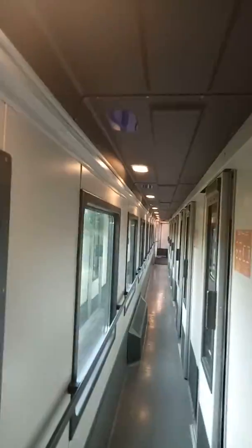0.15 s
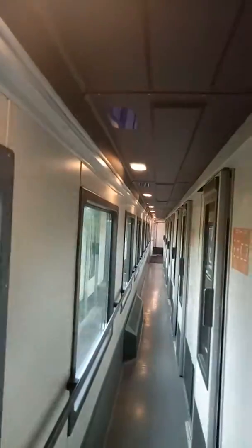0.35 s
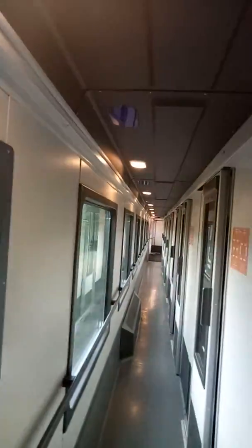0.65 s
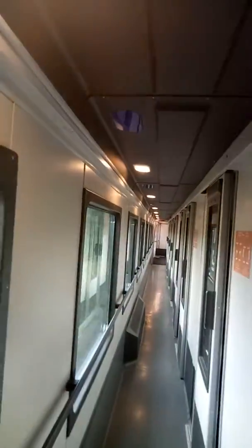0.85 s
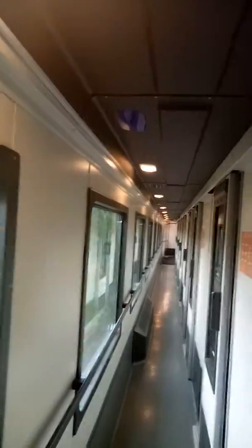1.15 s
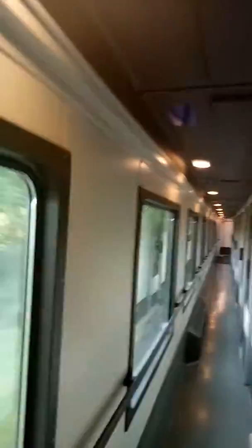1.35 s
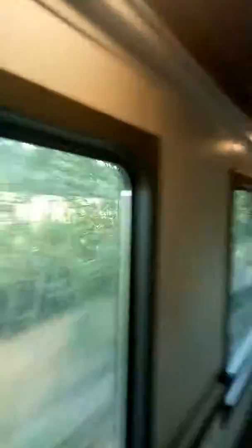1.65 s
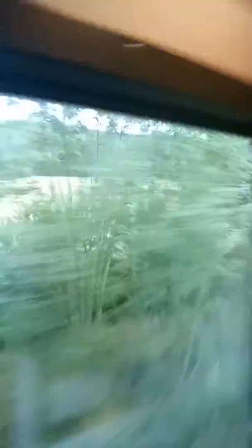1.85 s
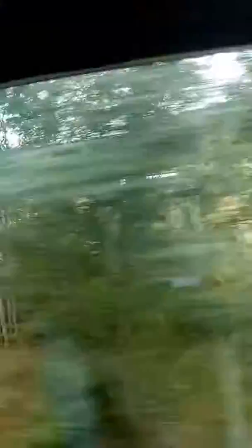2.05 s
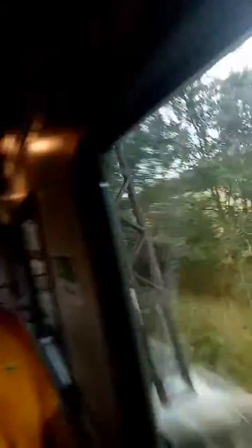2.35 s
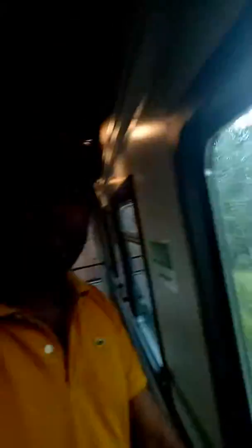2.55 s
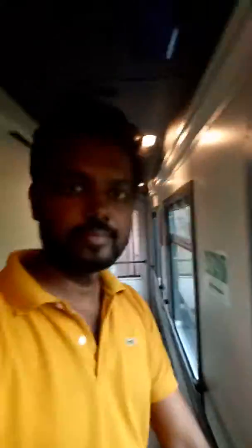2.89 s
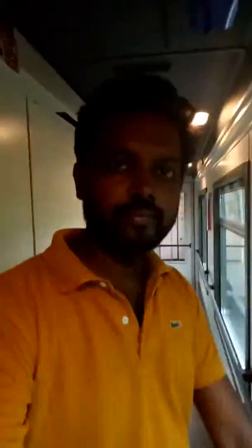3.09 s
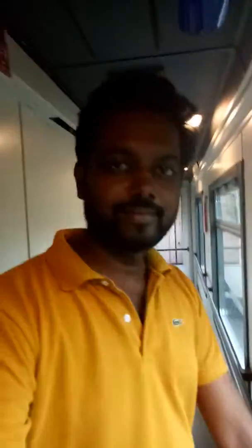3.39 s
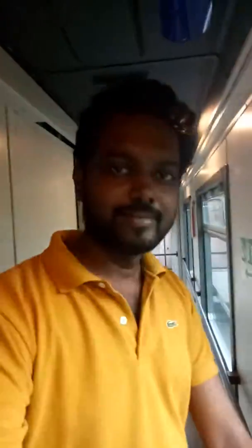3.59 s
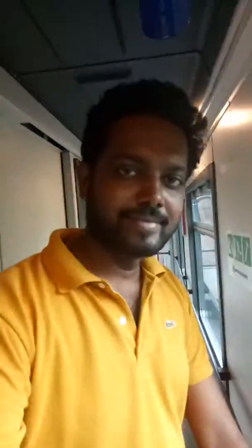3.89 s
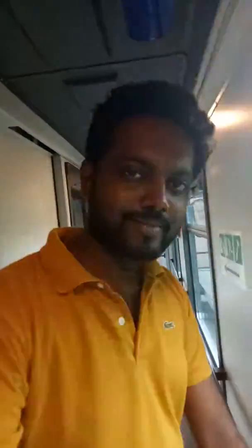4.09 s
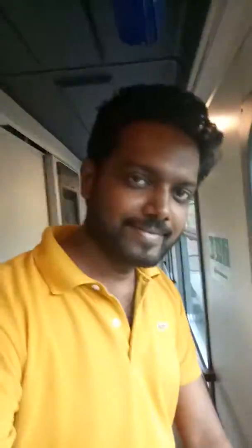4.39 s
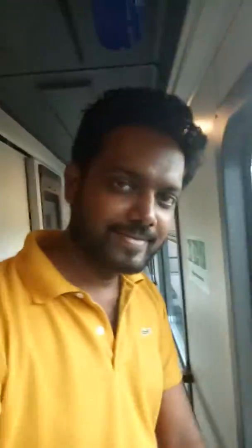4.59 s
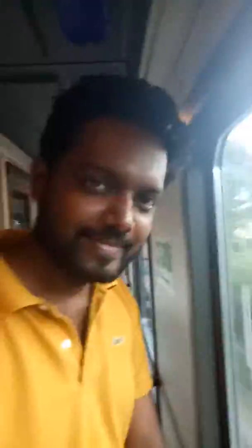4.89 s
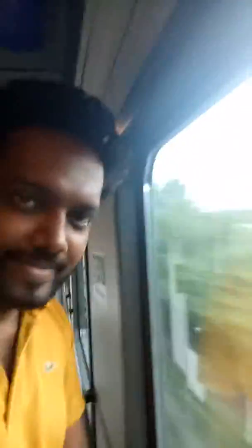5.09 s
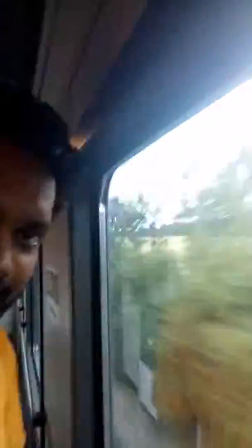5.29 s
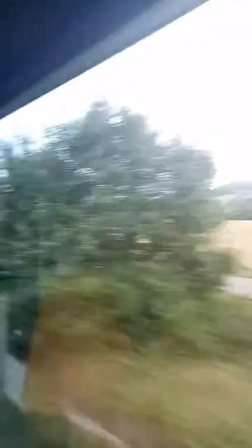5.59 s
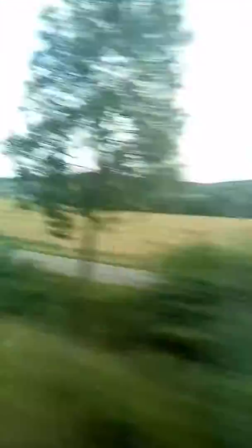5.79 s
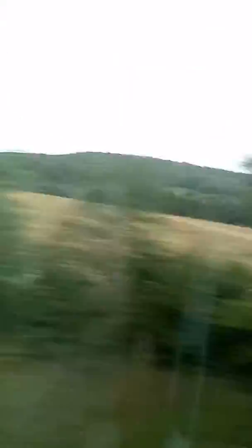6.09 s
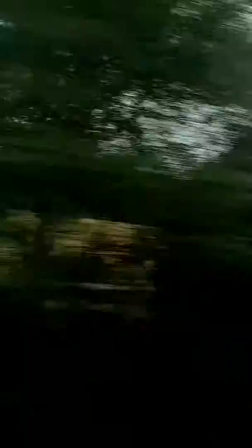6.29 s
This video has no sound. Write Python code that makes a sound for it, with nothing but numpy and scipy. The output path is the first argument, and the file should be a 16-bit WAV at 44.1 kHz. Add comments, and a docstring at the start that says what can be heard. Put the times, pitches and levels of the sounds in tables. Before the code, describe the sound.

Continuous train interior close beside the windows: bass-heavy rumbling with short boomy lurches, a broad mid-range roar of wheels and soft airy hiss. A few muffled knocks underfoot come first; then the window air grows hollow and sharper as the handheld microphone swings round. Later a faint high ring sings more clearly, a flange brushes the rail, and a last cluster of dull thumps arrives. Stereo, weighted left, with no rhythmic rail joints.

```python
"""A deep rumble with a swelling boom runs throughout, in the corridor of a passenger carriage at speed on welded track.
The bogies shake the body: shaped noise in its panels and two wavering low tones; dull knocks come up from below.
The wheels roar on the rails as broad noise, ring in a thin whine of wavering tones, and a flange brushes the rail.
Air hisses along the windows as bands of noise that grow when the two-port microphone beside them turns back."""
import sys
import numpy as np
from scipy import signal
from scipy.fft import rfft, irfft, next_fast_len
from scipy.io import wavfile
from scipy.ndimage import uniform_filter1d, minimum_filter1d

SR = 44100
rng = np.random.default_rng(int(sys.argv[2]) if len(sys.argv) > 2 else 0)


def int16_out(signal):
    """Quantize to a 16-bit WAV file."""
    q = np.round(np.clip(np.atleast_2d(signal).T, -1, 1) * 32767)
    wavfile.write(sys.argv[1], SR, q.astype(np.int16))


N = 284445  # samples


def from_db(db):
    """Decibels to gain."""
    return 10 ** (np.asarray(db) / 20)


def rms_one(x):
    """Scale so that the middle of the channels has rms 1."""
    middle = np.atleast_2d(x).mean(axis=0)
    return x / np.sqrt(np.mean(middle ** 2) + 1e-20)


def in_time(rows):
    """A curve of (t/s, value) at every sample."""
    t, value = np.transpose(rows)
    return np.interp(np.arange(N) / SR, t, value)


def swells(rows):
    """Sum of cosine-squared rises and falls: (crest t/s, whole length/s, height)."""
    t = np.arange(N) / SR
    return sum(height * np.cos(np.pi * np.clip((t - crest) / length, -.5, .5)) ** 2
               for crest, length, height in rows)


def swells_db(rows):
    """Gain of swells from silence: (crest t/s, whole length/s, level/dB)."""
    return swells([(crest, length, from_db(db)) for crest, length, db in rows])


def drift(rate):
    """Slow chance of rms 1: noise through two equal one-pole low-passes with corners at rate/Hz."""
    step = 40  # samples between the slow values
    pole = np.exp(-2 * np.pi * rate * step / SR)
    noise = rng.standard_normal(N // step + 2002)
    slow = signal.lfilter([1], [1, -2 * pole, pole * pole], noise)[2000:]  # drop the run-in
    return np.interp(np.arange(N) / step, np.arange(len(slow)), rms_one(slow))


def bin_hz():
    """Frequencies of the noise spectra, f/Hz."""
    return np.maximum(np.fft.rfftfreq(next_fast_len(N, True), 1 / SR), 1)


def over_hz(points):
    """Points joined on a log-frequency axis."""
    hz, value = np.transpose(points)
    return np.interp(np.log(bin_hz()), np.log(hz), value)


def colour(points):
    """Gain of a spectrum that falls away steeply outside its end points."""
    hz = bin_hz()
    outside = np.minimum(1, np.minimum(hz / points[0][0], points[-1][0] / hz))
    return from_db(over_hz(points)) * outside ** 5


def pan(left_db):
    """Left and right gains for a level difference, at constant power."""
    gains = from_db(np.array([[.5], [-.5]]) * left_db)
    return gains / np.sqrt(np.mean(gains ** 2, axis=0))


def resonance(hz, width_hz):
    """Power response of one mode, total 1; it is 6 dB down at width_hz either side."""
    power = 1 / (1 + ((bin_hz() - hz) / width_hz) ** 2) ** 2
    return power / power.sum()


# Likeness of the microphone's two ports in the cabin field: f/Hz, correlation (-1 to 1)
LIKENESS = [(60, 0.94), (150, 1), (260, 0.86), (450, 0.86), (560, 0.4), (660, 0.61), (850, 0.22),
            (1100, 0.043), (1380, 0.15), (1700, -0.29), (2100, -0.079), (2550, 0.089), (3300, -0.016)]


def cabin_noise(gain):
    """Coloured noise of the diffuse cabin field: long waves reach both ports alike, short ones do not."""
    size = next_fast_len(N, True)
    mid, side = rfft(rng.standard_normal((2, size)))
    alike = np.clip(over_hz(LIKENESS), -1, 1)
    both = np.sqrt(1 + alike) * mid + np.sqrt(1 - alike) * side * [[1], [-1]]
    return rms_one(irfft(both * gain, size)[:, :N])


def mode_noise(hz, width_hz):
    """One mode driven by noise."""
    return cabin_noise(np.sqrt(resonance(hz, width_hz)))


def modes_noise(rows):
    """Several modes driven by one noise: (f/Hz, width/Hz, relative level/dB)."""
    power = sum(from_db(db) ** 2 * resonance(hz, width) for hz, width, db in rows)
    return cabin_noise(np.sqrt(power))


def wavering_tone(hz, wander_hz, rate, flutter_db):
    """A randomly driven mode: its pitch and strength never quite settle."""
    phase = 2 * np.pi * np.cumsum(hz + wander_hz * drift(rate)) / SR
    return rms_one(np.sin(phase) * from_db(flutter_db * drift(rate)))


# Brief drops shared by roar, window sounds, drone and wall panel: lowest t/s, length/s, depth/dB
LULLS = [(0.73, 0.18, 2), (1.18, 0.1, 2), (1.46, 0.068, 1), (2.19, 0.073, 1.5), (2.89, .06, 1.5),
         (3.52, .096, 1.6), (4.7, .08, 3.5), (5.14, 0.064, 1), (5.44, 0.05, 2.5), (5.55, 0.1, 2),
         (5.79, .1, 1.5), (6.17, 0.13, 1.3)]


def lull_db():
    """Depth of the brief drops in level."""
    return swells(LULLS)


# Spectrum of the deep rumble: f/Hz, relative level per Hz/dB
RUMBLE_COLOUR = [(12, -21.5), (20, 0), (33, -23), (42, -17), (53, 1.5), (75, 17), (100, 7), (135, 11.5),
                 (175, 7.5), (260, -12.5)]
# The rumble heaves: crest t/s, length/s, rise/dB (negative sinks)
HEAVES = [(0.83, 0.54, 3.5), (1.27, 0.2, 0), (1.58, .22, -5), (1.85, .16, 4), (2.52, .2, 0),
          (3.25, 0.26, 6), (3.66, 0.13, 6), (4.1, .3, 3), (6.19, .14, -9)]


def rumble():
    """The bogies shake the shell into a heaving low noise."""
    return from_db(-30 + swells(HEAVES)) * cabin_noise(colour(RUMBLE_COLOUR))


# The body's main resonance swells as the carriage lurches: crest t/s, length/s, level/dB
LURCHES = [(0.1, 0.12, -26.5), (0.28, 0.077, -26.5), (0.69, 0.15, -18), (0.94, .2, -26), (1.21, 0.19, -21),
           (1.525, 0.13, -21.5), (1.72, 0.12, -27), (1.94, 0.15, -22), (2.2, 0.26, -24.5),
           (2.33, 0.22, -26), (2.53, 0.11, -20.5), (2.88, 0.092, -23), (3.18, 0.14, -23.5),
           (3.28, 0.1, -24), (3.38, .11, -25.5), (3.77, 0.13, -24), (4.19, 0.084, -28), (4.63, 0.1, -24.5),
           (5.18, 0.27, -24.5), (5.55, 0.23, -28), (5.73, 0.15, -29), (5.85, .13, -21), (6.08, 0.17, -24)]


def boom():
    """The body's main resonance: steady narrow noise, and a wavering tone at each lurch."""
    boom_hz = 116.2
    steady = from_db(-33) * mode_noise(boom_hz, width_hz=8.7)
    lurching = swells_db(LURCHES) * wavering_tone(boom_hz, wander_hz=5.07, rate=15, flutter_db=0.8)
    return steady + lurching


# A second body resonance throbs now and then: crest t/s, length/s, level/dB
THROBS = [(0.26, .16, -27.5), (0.52, .16, -27), (0.9, 0.17, -29.5), (1.14, 0.092, -24.5), (1.38, 0.15, -28),
          (1.6, 0.13, -31), (2.03, 0.11, -35), (2.31, 0.15, -29), (3.6, 0.1, -35), (3.95, 0.12, -34),
          (4.21, 0.065, -26), (6.1, 0.082, -21)]


def throbs():
    """The body resonance above the boom swells as a wavering tone."""
    return swells_db(THROBS) * wavering_tone(149.6, wander_hz=11, rate=18.0, flutter_db=1.0)


# How hard the track shakes the body: t/s, drone level before jolts and lulls/dB
SHAKING = [(0, -29), (0.3, -31.5), (0.6, -28.5), (1.4, -31), (2.3, -29.5), (3.4, -30.5), (4.3, -29),
           (5.6, -28), (6.15, -27.5), (6.45, -27.5)]
# Jolts make drone and panels thump: crest t/s, length/s, rise/dB (negative sinks)
JOLTS = [(0.52, .2, 1.5), (0.86, 0.16, 1.5), (1.45, 0.18, 1.5), (2.07, .11, 2), (2.44, 0.088, -1),
         (2.71, 0.11, 3), (3.62, 0.11, 1.5), (4.5, .2, 1), (5.3, 0.16, 2), (5.47, .1, 0), (6.12, 0.1, 3)]
# Spectrum of the drone: f/Hz, relative level per Hz/dB
DRONE_COLOUR = [(110, 4), (170, 0), (225, 2.5), (300, -3), (400, -6), (560, -10), (750, -12.5), (950, -9.5),
                (1400, -53.5)]
# Floor panel resonances: f/Hz, width/Hz, relative level/dB
PANEL_MODES = [(84.5, 64, -3.5), (102.4, 7, -4.5), (145.5, 18, -2.5), (267, 23, -13.5), (352, 59, -6),
               (460.3, 29, -9)]


def drone_and_panels():
    """Shaking fills the shell with a swaying drone and rings the floor panels."""
    level_db = in_time(SHAKING) + swells(JOLTS) - lull_db()
    sway_db = 0.5 * drift(13.0)
    drone = from_db(level_db + sway_db) * cabin_noise(colour(DRONE_COLOUR))
    panels = from_db(level_db - 0.4) * modes_noise(PANEL_MODES)
    return drone + panels


# A partition drones, louder at some moments than at others: t/s, level/dB
PARTITION_LEVEL = [(0, -38), (0.3, -34), (0.65, -33), (1.15, -38), (1.5, -31.5), (1.9, -35.5), (2.3, -28.5),
                   (2.75, -30), (3.3, -38.5), (3.7, -35), (4.1, -43), (4.45, -39), (4.75, -34), (5.0, -38),
                   (5.25, -32), (5.55, -37), (6.0, -28.5), (6.45, -34)]


def partition():
    """A droning partition: one broad low mode driven by noise."""
    return from_db(in_time(PARTITION_LEVEL)) * mode_noise(191, width_hz=37)


# A light wall panel hums along: t/s, level before lulls/dB
WALL_LEVEL = [(0, -40), (0.55, -36), (0.9, -39), (1.6, -37.5), (2.4, -43), (3.7, -37.5), (5.5, -44),
              (5.9, -40), (6.28, -38), (6.45, -43)]


def wall_panel():
    """A light panel's mode driven by noise; it eases in the lulls."""
    return from_db(in_time(WALL_LEVEL) - lull_db()) * mode_noise(668, width_hz=95)


def body():
    """The shaken carriage body, leaning to the left port."""
    low = rumble() + boom() + throbs()
    return (low + drone_and_panels() + partition() + wall_panel()) * pan(left_db=5.5)


# Spectrum of the wheel roar: f/Hz, relative level per Hz/dB
ROAR_COLOUR = [(450, -8.5), (750, -9), (1000, -6), (1300, -5.5), (1600, -2), (1780, -0.5), (2050, -3.5),
               (2400, -7), (2750, -14.5), (3300, -27), (5000, -40)]
# The roar leans left: f/Hz, left-right level/dB
ROAR_PAN = [(700, 6), (1200, 8.5), (1800, 10), (2200, 13.5), (2800, 8), (4000, 4)]
# Weaker wheel modes: f/Hz, width/Hz, relative level/dB, left-right level/dB
WHEEL_MODES = [(1636, 23, -14, 12.5), (1804, 18, -20.5, 7.5), (1868, 11, -20.5, 9.5),
               (2280, 18, -17.5, 7.5), (2345, 25, -16, 16), (3043, 13, -22, 8), (3424, 40, -22.5, -7),
               (4710, 27, -27.5, 7.5), (5240, 25, -33, 2.5), (5410, 30, -33, 2.5)]


def wheels():
    """Rail roughness makes a broad roar and keeps the wheel modes ringing."""
    roar_db, ringing_db = -29, -39
    roar = from_db(roar_db) * cabin_noise(colour(ROAR_COLOUR) * pan(over_hz(ROAR_PAN)))
    power = sum((from_db(db) * pan(left_db)) ** 2 * resonance(hz, width)
                for hz, width, db, left_db in WHEEL_MODES)
    ringing = from_db(ringing_db) * cabin_noise(np.sqrt(power))
    flutter_db = 0.5 * drift(8.3)
    return from_db(flutter_db) * (roar + ringing)


# Pitch of the wheel's ring, higher by the end: t/s, f/Hz
WHINE_PITCH = [(0, 1719), (2.3, 1722), (4.2, 1720), (4.9, 1714), (5.5, 1737), (6.45, 1733)]
# The ring sings out over its steady level: crest t/s, length/s, added level/dB
SPELLS = [(0.444, 0.12, -30.5), (0.555, 0.11, -33), (0.14, .14, -40), (0.72, .12, -43), (1.13, 0.13, -38.5),
          (1.25, 0.11, -37), (1.58, 0.13, -39), (1.79, 0.18, -36), (1.93, .14, -37), (2.06, 0.2, -36),
          (2.22, 0.19, -36), (2.36, 0.16, -35), (2.67, 0.13, -37), (4.17, .25, -41), (4.66, .2, -36),
          (4.893, 0.26, -28), (5.08, 0.13, -44), (5.4, 2.6, -41.5), (5.28, 0.28, -31.5),
          (5.49, 0.18, -29.5), (5.77, 0.26, -30), (6.16, 0.1, -37), (6.29, 0.092, -31)]
# A neighbouring lower mode answers in weaker spells: crest t/s, length/s, level/dB
LOWER_SPELLS = [(0.85, .4, -42), (1.34, 0.18, -33), (2.05, .3, -37), (4.68, .22, -38), (4.95, 0.5, -35),
                (5.33, .3, -40), (5.75, .4, -37), (6.2, 0.27, -40)]
# A higher wheel mode rings faintly: crest t/s, length/s, level/dB
UPPER_SPELLS = [(3.3, 0.5, -41), (4.42, 0.66, -37), (5.62, 0.14, -39), (5.98, 0.22, -37)]


def whine():
    """Two close wheel modes and a higher one sing in spells; the main one wavers apart in each port."""
    pitch_hz = in_time(WHINE_PITCH)
    singing = from_db(-40) + swells_db(SPELLS)  # faint steady ring plus spells
    main = np.array([wavering_tone(pitch_hz, wander_hz=3.6, rate=12.5, flutter_db=1.6) for _ in range(2)])
    lower_tone = wavering_tone(pitch_hz - 57, wander_hz=8, rate=26, flutter_db=5.0)
    upper_tone = wavering_tone(2384, wander_hz=7, rate=22, flutter_db=3.5)
    others = swells_db(LOWER_SPELLS) * lower_tone + swells_db(UPPER_SPELLS) * upper_tone
    return (singing * main + others) * pan(left_db=22.5)


# A flange brushes the rail: crest t/s, length/s, level/dB
BRUSHES = [(0.04, .14, -39), (1.63, 0.72, -40), (5.02, 0.11, -36.5), (5.36, 0.1, -30), (5.98, 0.37, -31.5)]
# Modes it sets ringing: f/Hz, width/Hz, relative level/dB
FLANGE_MODES = [(1960, 130, 1), (2190, 35, -6), (2260, 23, -6), (2520, 120, -11.5)]


def flange():
    """A flange brushes the rail: bright swells of noise in the wheel's modes."""
    return swells_db(BRUSHES) * modes_noise(FLANGE_MODES) * pan(left_db=16)


# Dull knocks from the running gear: t/s, level/dB, centre f/Hz, width/Hz
KNOCKS = [(0.135, -28, 640, 170), (0.415, -22, 215, 50), (0.545, -29, 320, 90), (0.62, -34, 600, 200),
          (1.385, -33, 480, 200), (2.05, -30, 215, 45), (3.89, -24, 230, 60), (6.085, -22, 227.5, 60),
          (6.25, -27, 330, 90), (6.275, -31, 680, 240), (6.365, -26, 368, 130)]


def knocks():
    """Each blow from the running gear sets a patch of close body modes ringing briefly."""
    attack_s, t60_s = 0.0046, 0.32
    out = 0
    for start, db, hz, width in KNOCKS:
        age = np.maximum(np.arange(N) / SR - start, 0)
        decay = from_db(db - 60 * age / t60_s)
        envelope = np.minimum(age / attack_s, 1) * decay
        out = out + envelope * mode_noise(hz, width)
    return out * pan(left_db=7.0)


# The rolling noise swells in the low middle: crest t/s, length/s, level/dB
ROLLS = [(0.14, .12, -34), (0.52, .26, -37), (1.62, .2, -33.5), (2.08, .1, -36), (2.72, 0.13, -36),
         (3.65, .14, -37), (3.3, 0.57, -44), (4.52, .16, -41), (4.77, .12, -32), (5.28, .3, -39),
         (6.07, 0.24, -36), (6.32, 0.3, -33.5)]
# Spectrum of these swells: f/Hz, relative level per Hz/dB
ROLL_COLOUR = [(250, -3), (330, 3), (450, -12), (650, -3.5), (950, -6)]


def rolls():
    """Low-middle swells of the rolling noise."""
    return swells_db(ROLLS) * cabin_noise(colour(ROLL_COLOUR)) * pan(left_db=3.5)


# Where the microphone points: t/s, turn (0 = ahead along the corridor, 1 = back along it)
TURN = [(0, 0.31), (1.5, 0.13), (2.15, 0.39), (2.7, 0.72), (3.6, 0.95), (4.5, 0.9), (4.85, 0.56),
        (5.45, 0.66), (5.85, 0.13), (6.45, 0.3)]


def microphone_turn():
    """The microphone's turn beside the windows."""
    return in_time(TURN)


# Spectrum of the air's rush: f/Hz, relative level per Hz/dB
RUSH_COLOUR = [(700, -10), (1000, -1.5), (1250, 6.5), (1430, 10), (1600, 5.5), (2000, -45.5)]


def window_rush():
    """The slipstream scours the glass: a rush that grows as the microphone turns back."""
    level_db = -40.5 + 3.5 * microphone_turn() + 1.0 * drift(3.9)
    return from_db(level_db) * cabin_noise(colour(RUSH_COLOUR)) * pan(left_db=5.5)


# Hollow resonances come and go at the window: crest t/s, length/s, f/Hz, width/Hz, level/dB
HOLLOW_SPELLS = [(2.5, 1.0, 1480, 27, -38), (2.73, .12, 1580, 110, -31), (2.9, 0.73, 1370, 18, -36),
                 (3.12, .2, 1360, 12, -37), (3.05, .6, 1620, 25, -41), (3.35, 2, 1117, 35, -40),
                 (3.6, .5, 1390, 16, -37), (3.777, .4, 1438, 22, -35.5), (4.07, .25, 1460, 41, -34),
                 (4.45, .4, 1410, 30, -38)]


def window_hollows():
    """Shifting hollow resonances in the slipstream's noise."""
    hollows = sum(swells_db([(crest, length, db)]) * mode_noise(hz, width)
                  for crest, length, hz, width, db in HOLLOW_SPELLS)
    return hollows * pan(left_db=13.5)


# Flickering bands of the hiss: f/Hz, width/Hz, level against the hiss/dB
PATCHES = [(2750, 240, -15), (3320, 260, -16), (4090, 330, -15.5)]


def hiss_patches():
    """Bands of the hiss that flare and fade each on its own."""
    return sum(from_db(db + 3 * drift(15)) * mode_noise(hz, width) for hz, width, db in PATCHES)


# Spectrum of the window hiss: f/Hz, relative level per Hz/dB
HISS_COLOUR = [(1800, -6.5), (2700, 1), (3300, -1), (4000, -0.5), (4550, -3), (5100, -8.5), (6000, -13.5),
               (6900, -21), (7500, -28.5), (8200, -39), (9500, -52)]
# The hiss about its mean direction: f/Hz, left-right level/dB
HISS_PAN = [(2500, 2), (3800, 2), (4600, -4.5), (5300, -1.5), (6500, 2.5), (7300, 0.5), (8500, -4),
            (14000, -2.5)]


def window_hiss():
    """Air hisses along the glass, louder and further left as the microphone turns back."""
    turn = microphone_turn()
    level_db = -37 + 4 * turn + 0.54 * drift(32)  # the last term gusts on its own
    hiss = cabin_noise(colour(HISS_COLOUR) * pan(over_hz(HISS_PAN))) + hiss_patches()
    return from_db(level_db) * hiss * pan(2.5 + 6 * turn)


# Sharper gusts of the hiss: crest t/s, length/s, level/dB
GUSTS = [(3.33, .16, -39), (3.62, 0.25, -45), (3.9, .4, -41), (4.15, .1, -47), (4.45, .12, -38)]


def gusts():
    """The hiss turns sharper in gusts: swells of one broad high band."""
    return swells_db(GUSTS) * mode_noise(3640, width_hz=400) * pan(left_db=5)


# Spectrum of a faint hiss above everything: f/Hz, relative level per Hz/dB
TOP_HISS_COLOUR = [(8000, 0), (9500, 0.5), (12000, -4.5), (15400, -6)]


def top_hiss():
    """A faint steady hiss at the top of the range."""
    return from_db(-71.5) * cabin_noise(colour(TOP_HISS_COLOUR)) * pan(left_db=3.0)


# Brief surges of roar and window sounds: crest t/s, length/s, rise/dB
SURGES = [(0.56, 0.11, 0.5), (0.85, 0.23, 1), (1.6, 0.17, 2.1), (2.04, 0.1, 0.8), (2.45, 0.097, 1.5),
          (2.74, 0.055, 2), (2.83, .05, 0.5), (3.63, .09, 0.5), (4.63, 0.15, 1.5), (4.99, 0.15, 2.5),
          (5.99, 0.11, 0.5)]


def surge():
    """Restless gain shared by the roar and the window sounds."""
    restless_db = 0.58 * drift(28)
    return from_db(swells(SURGES) - lull_db() + restless_db)


def scene():
    """All that is heard in the corridor; roar and window sounds surge and drop together."""
    moving_air = window_rush() + window_hollows() + window_hiss()
    surging = surge() * (wheels() + moving_air)
    return body() + surging + whine() + flange() + knocks() + rolls() + gusts() + top_hiss()


def limiter(x, top, size):
    """The gain eases down around each peak that would pass the top; size in samples."""
    needed = np.minimum(1, top / (np.abs(x).max(axis=0) + 1e-9))
    return x * uniform_filter1d(minimum_filter1d(needed, size), size)


def record(dry):
    """Both ends are eased over 4 ms; peaks are held down and the top is cut steeply."""
    from_end_s = np.minimum(np.arange(N), np.arange(N)[::-1]) / SR
    eased = np.sin(np.pi / 2 * np.minimum(from_end_s / .004, 1)) ** 2
    held = limiter(dry * eased, top=.44, size=441)
    low_pass = signal.ellip(10, .1, 80, 15400, fs=SR, output="sos")  # order, ripple/dB, stop/dB, f/Hz
    return signal.sosfilt(low_pass, held)


dry = scene()
out = record(dry)
int16_out(out)
```